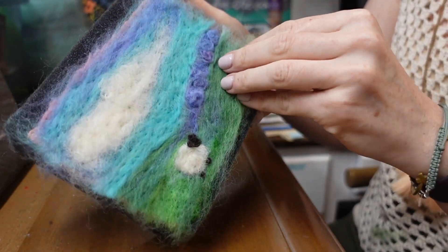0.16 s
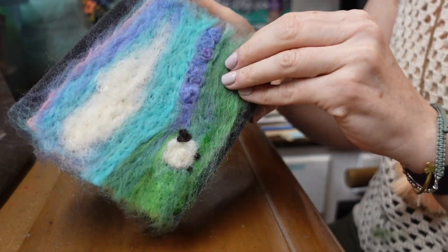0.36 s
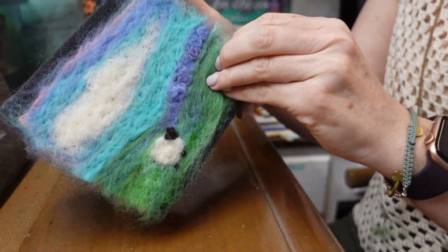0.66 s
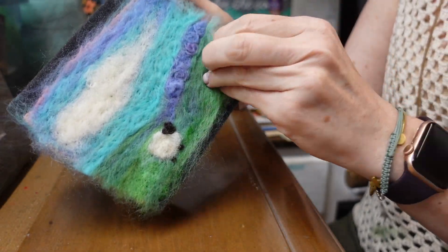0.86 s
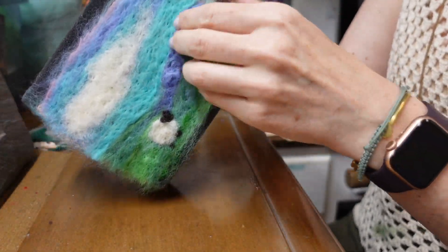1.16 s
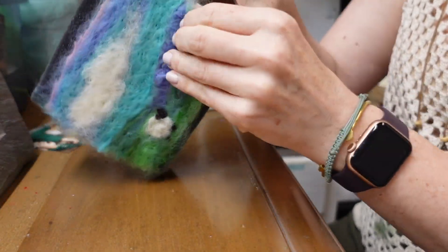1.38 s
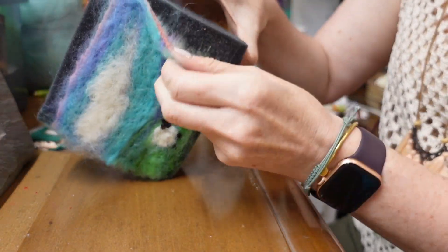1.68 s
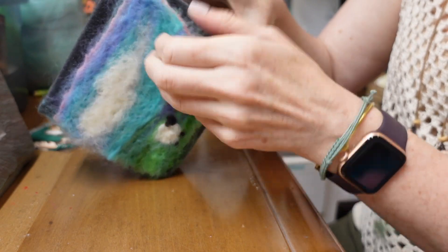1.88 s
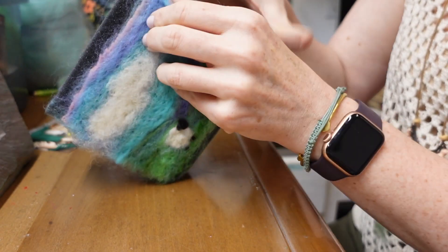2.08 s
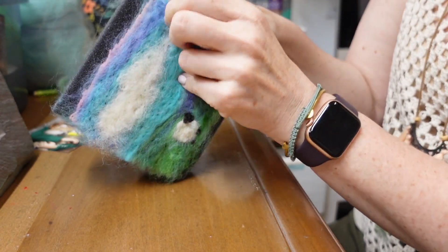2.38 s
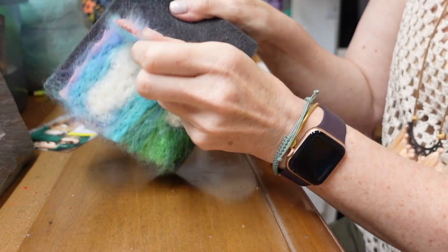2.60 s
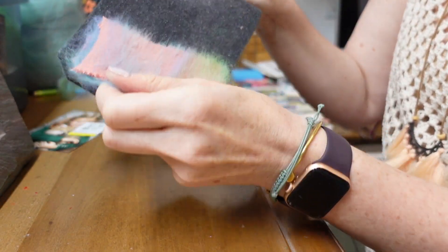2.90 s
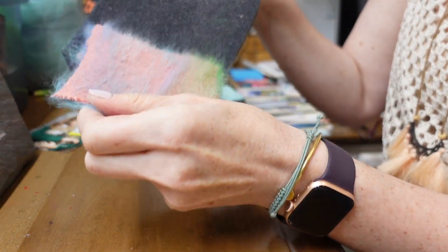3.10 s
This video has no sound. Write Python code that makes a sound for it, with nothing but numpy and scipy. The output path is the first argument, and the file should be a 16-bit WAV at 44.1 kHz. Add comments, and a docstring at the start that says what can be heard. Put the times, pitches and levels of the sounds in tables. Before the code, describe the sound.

Dry ripping of wool fibres from foam, in short pulls, then one long loud tear.

```python
"""Felted wool is peeled off a foam pad by hand, close to a mono microphone. Brushing noise is joined by a dense dry
crackle of random releases while the wool is pulled; filtered noise bursts make the single louder snaps.
Fingers rub as narrow noise swells, a small hard tick is a sum of decaying sines, and the pad bumps the wooden
table as low ringing sines. Under it lie the shaped noise of a quiet room and a wavering low hum."""
import sys
import numpy as np
from scipy import signal
from scipy.fft import rfft, irfft, next_fast_len
from scipy.io import wavfile
from scipy.ndimage import uniform_filter1d, map_coordinates

SR = 44100
rng = np.random.default_rng(int(sys.argv[2]) if len(sys.argv) > 2 else 0)


def elevation(decibels):
    """Turn decibel levels (scalar or array-like) into linear amplitude ratios."""
    levels = np.asarray(decibels, float)
    return 10 ** (levels / 20)


def generate_wav(signal):
    """Clip the signal to [-1, 1] and save it as 16-bit WAV at the path in sys.argv[1]."""
    frames = np.transpose(np.atleast_2d(signal))
    scaled = np.clip(frames, -1, 1) * 32767
    pcm = np.round(scaled).astype(np.int16)
    wavfile.write(sys.argv[1], SR, pcm)


N = 143325

# Course of the rustle: (time [s], level of the 3.3-9.2 kHz band [dB], then level over that band
# below 0.78 kHz [dB], at 0.78-1.5 kHz [dB], at 1.5-3.3 kHz [dB], above 9.2 kHz [dB])
RUSTLE_COURSE = [(0, -37, -12, -16, -7, -5), (0.045, -48.5, -2, -3.5, -3, -6),
                 (0.08, -51.5, -8, -7.5, -5.5, -5), (0.25, -60.5, -0.5, -4.5, -3.5, -3),
                 (0.4, -62.5, -3, -5, -5.5, -2), (0.43, -55, -3.5, -7, -3, -6),
                 (0.7, -47.5, -10, -17.5, -7, -9), (0.79, -40, -14, -14, -8.5, -11),
                 (0.821, -45.5, -7, -5.5, 4, -0.5), (0.85, -39.5, -13.5, -15, -5.5, -10),
                 (0.99, -41.5, -18.5, -20, -8.5, -11), (1.025, -53, -10, -7, -8.5, -4),
                 (1.2, -57.5, -1, -10, -6, -5.5), (1.234, -59.5, -3.5, 0, -1, -5),
                 (1.273, -43.5, -7.5, 0, -1, -13), (1.289, -57, -1, -6, -5, -8),
                 (1.33, -50, -2.5, -2.5, -7.5, -1.5), (1.42, -54.5, -4.5, -5, -5, -6),
                 (1.477, -50.5, -12.5, -12, -11, -5), (1.493, -42.5, -14.5, -5.5, -0.5, 0),
                 (1.541, -38, -11, -12.5, -8.5, -8), (1.698, -31, -15.5, -15.5, -9, -11),
                 (1.751, -23, -14, -18.5, -7.5, -12.5), (1.812, -52.5, -11.5, -6.5, -5, -9),
                 (2.016, -60.5, -3.5, 0.5, -2, 2.5), (2.026, -51, -6.5, -1, 2.5, -8),
                 (2.083, -42.5, -12.5, -4, -7.5, -2), (2.115, -58, -1.5, -8, -4, -8),
                 (2.16, -46.5, -13, -11.5, -10, -16), (2.209, -43.5, -8.5, -7.5, -17, -0.5),
                 (2.25, -52, -7, -8, 0, -10), (2.28, -44, -9, -1.5, -4.5, -8),
                 (2.341, -42, -11.5, -12.5, -10, -10), (2.42, -31, -13.5, -15.5, -6, -13.5),
                 (2.65, -30, -12.5, -19.5, -4.5, -16.5), (2.904, -29.5, -11.5, -13.5, -4, -12),
                 (3.032, -33, -16.5, -25, -6.5, -16), (3.084, -33, -11.5, -22, -4, -13),
                 (3.16, -22.5, -11.5, -23, -3.5, -12.5), (3.25, -21, -11.5, -22, -7.5, -16)]
# Louder single snaps: (time [s], peak of the bright part [dB], pitch [Hz])
SNAP_EVENTS = [(0.1705, -37, 4740), (0.6434, -21, 7110), (0.7173, -24, 5810), (0.7672, -22, 3590),
               (0.7734, -18, 6330), (0.8051, -21, 5860), (0.817, -13, 7100), (0.8324, -20, 3140),
               (0.8794, -23, 4390), (0.9298, -18, 3750), (0.9374, -22, 2910), (0.9807, -21, 6420),
               (1.1333, -27, 7790), (1.4824, -21, 6220), (1.4885, -16, 6180), (1.5194, -22, 6170),
               (1.5903, -14, 4970), (1.6551, -14, 5710), (1.695, -13, 7220), (1.9345, -26, 8120),
               (2.3481, -20, 2000), (2.3624, -17, 5000), (2.3754, -21, 4830), (2.4239, -14, 2680),
               (2.4987, -10, 3370), (2.585, -10, 2850), (2.6604, -12, 5030), (2.6888, -11, 2710),
               (2.6964, -9, 3810), (2.7955, -12, 1890), (2.8794, -11, 3190), (2.8988, -10, 2520),
               (2.9342, -8, 3840), (2.9811, -14, 2460), (3.0455, -13, 6850), (3.0679, -15, 6830),
               (3.0864, -8, 3170), (3.1043, -8, 2650), (3.1243, -11, 2610), (3.1413, -8, 2450)]
# Soft bumps of the pad on the table: (time [s], level of the main partial [dB], pitch [Hz])
BUMP_EVENTS = [(0.453, -41.5, 138), (0.536, -43, 127), (0.937, -44, 140), (1.089, -41.5, 140),
               (1.282, -41.5, 135), (1.345, -33, 167), (1.381, -32, 147), (1.417, -30, 149),
               (1.449, -33.5, 166), (1.467, -28, 141), (1.502, -39, 138), (1.534, -31.5, 133),
               (1.595, -33, 138), (1.834, -43.5, 124), (2.064, -41, 129), (2.09, -42.5, 140),
               (2.172, -40.5, 140), (2.311, -42.5, 85.5)]
# Colour of wool fibres on foam: (frequency [Hz], relative density [dB per Hz])
FIBRE_COLOUR = [(60, -21.5), (120, -8.5), (200, -9), (600, -7.5), (1100, -6.5), (1900, 0.5), (2200, 1.5),
                (2650, 3), (3300, 1), (4000, 0), (6200, -0.5), (7250, 1.5), (8500, -5.5), (11000, -8),
                (16000, -11)]
# Colour of the room tone: (frequency [Hz], relative density [dB per Hz])
ROOM_COLOUR = [(25, 24), (64, 18), (87, 19), (301, -21.5), (2220, -25), (16000, -40)]
# Ringing modes of the hard contact: (frequency [Hz], level over the tick's own [dB], T60 [s])
HARD_MODES = [(312, 3, 0.022), (1490, 6.5, 0.017), (3380, 1, 0.0088)]
# A fingernail or bead touches something hard: (time [s], level [dB])
TICK_EVENTS = [(1.193, -38.5)]
# Pulls of the wool, the only spans that crackle: (start [s], end [s])
PULLS = [(0.57, 1.01), (1.48, 1.8), (2.32, 3.3)]
# Fingers sliding over the wool: (centre time [s], length [s], centre frequency [Hz], level at the crest [dB])
RUB_EVENTS = [(1.268, 0.019, 1640, -41), (1.389, 0.015, 1200, -47), (1.398, .015, 680, -51),
              (2.202, 0.025, 7100, -38.5)]

ROOM_TONE_DB = -64.5
HUM_HZ, HUM_DB, HUM_WAVER_DB = 57, -58, 1.5
ROOM_DB, ROOM_T60_S = -14, 0.17
BUMP_RISE_S, BUMP_T60_S = 0.01, 0.073
BUMP_SAG = 0.033  # share by which the pitch falls in each half T60
RUB_WIDTH_OCTAVES = 0.17
SNAP_RISE_S, SNAP_T60_S = 0.0002, 0.0065
SNAP_RING_DB, SNAP_WIDTH_OCTAVES = 10, 0.25  # lift at a snap's own pitch
SNAP_BODY_DB, SNAP_TOP_DB = -7.5, -1  # added to the rustle's own band levels
BAND_EDGES_HZ, EDGE_STEEPNESS = (780, 1500, 3300, 9200), 10.6
PATCHY_DB = 2
CRACKLE_PER_S = 1100  # releases a second where the rustle level is -35 dB
CRACKLE_DENSER = 0.69  # dB more releases a second for each dB of rustle level
CRACKLE_SPREAD_DB, CRACKLE_MOST_DB = 5.5, 13  # mean of the exponential draw of sizes, and its cap
CRACKLE_RISE_S, CRACKLE_T60_S = 0.0001, 0.004
# inside a pull, crackle takes half the power once the rustle passes this level; below it only brushing is heard
SHARE_AT_DB, SHARE_PER_DB, SHARE_MOST = -46, 9, 0.5
CEILING = 0.5


def unit(x):
    """Scale to rms 1."""
    return x / np.sqrt(np.mean(x ** 2) + 1e-20)


def along(points, hz):
    """Read (frequency, value) points on a log-frequency axis."""
    f, v = np.transpose(points)
    return np.interp(np.log(hz + 1), np.log(f + 1), v)


def wobble(rate):
    """A smooth random curve with rate knots a second."""
    return map_coordinates(rng.standard_normal(int(N * rate / SR) + 4), [np.arange(N) * rate / SR])


def filtered(x, response):
    """Filter x by a response given as a function of frequency."""
    m = next_fast_len(x.shape[-1] + 8192)
    spectrum = rfft(x, m) * response(np.fft.rfftfreq(m, 1 / SR))
    return irfft(spectrum, m)[..., :x.shape[-1]]


def burst(rise_s, t60_s, t):
    """Quick rise, exponential fall, peak 1."""
    shape = (1 - np.exp(-t / rise_s)) * elevation(-60 * t / t60_s)
    return shape / shape.max()


def bell(hz, centre_hz, octaves):
    """A bump on a log-frequency axis, peak 1."""
    return np.exp(-0.5 * (np.log2((hz + 1) / centre_hz) / octaves) ** 2)


def fibre_bands(hz):
    """The colour of wool on foam, split into five neighbouring bands."""
    lowpasses = [1 / (1 + (hz / edge_hz) ** EDGE_STEEPNESS) for edge_hz in BAND_EDGES_HZ]
    under = [0 * hz] + lowpasses + [0 * hz + 1]
    return elevation(along(FIBRE_COLOUR, hz)) * np.diff(under, axis=0)


def patchy(x):
    """Random gain in patches some 500 Hz wide and 50 ms long, for a tear line that moves."""
    z = signal.stft(x, nperseg=256)[2]
    field = rng.standard_normal(z.shape)
    field = uniform_filter1d(field, size=3, axis=0)
    field = uniform_filter1d(field, size=18, axis=1)
    return signal.istft(z * elevation(PATCHY_DB * unit(field)), nperseg=256)[1][:N]


def background():
    """Room tone as shaped steady noise, and a low hum that wavers in phase and level."""
    air = unit(filtered(rng.standard_normal(N), lambda hz: elevation(along(ROOM_COLOUR, hz))))
    hum = np.sin(2 * np.pi * HUM_HZ * np.arange(N) / SR + 0.58 * wobble(8.0))
    hum_level = elevation(HUM_DB + HUM_WAVER_DB * wobble(13.5))
    return elevation(ROOM_TONE_DB) * air + hum_level * hum


def room(x):
    """The short diffuse answer of a furnished room: a decaying noise tail."""
    t = np.arange(SR // 3) / SR
    tail = rng.standard_normal(len(t)) * elevation(-60 * t / ROOM_T60_S) * (t > 0.002)
    return signal.fftconvolve(x, tail / np.linalg.norm(tail))[:N]


def bumps():
    """The soft pad sets the table top ringing low and briefly; the pitch falls as the pad settles."""
    out, t = np.zeros(N + SR), np.arange(SR // 4) / SR
    for s, db, hz in BUMP_EVENTS:
        turns = hz * t * (1 + BUMP_SAG * (0.5 - t / BUMP_T60_S))
        ring = np.sin(2 * np.pi * turns)
        ring += 0.5 * np.sin(2 * np.pi * 0.655 * turns)
        ring += 0.081 * np.sin(2 * np.pi * 1.66 * turns)
        out[round(s * SR):][:len(t)] += elevation(db) * burst(BUMP_RISE_S, BUMP_T60_S, t) * ring
    return out[:N]


def tick():
    """A small hard contact: a few modes start together and decay."""
    out = np.zeros(N)
    for s, tick_db in TICK_EVENTS:
        t = np.clip(np.arange(N) / SR - s, 0, None)  # the sines stay at zero before the contact
        for hz, db, t60 in HARD_MODES:
            out += elevation(tick_db + db - 60 * t / t60) * np.sin(2 * np.pi * hz * t)
    return out


def rubs():
    """Fingers slide over the wool: short swells of narrow friction noise."""
    out, t = np.zeros(N), np.arange(N) / SR
    for s, length, centre_hz, db in RUB_EVENTS:
        swell = np.exp(-0.5 * ((t - s) / (length / 2)) ** 2)
        friction = filtered(rng.standard_normal(N), lambda hz: bell(hz, centre_hz, RUB_WIDTH_OCTAVES))
        out += elevation(db) * swell * unit(friction)
    return out


def snaps():
    """Each snap is a fresh noise burst of a few ms in the colour of the fibres, lifted at its own pitch."""
    lead = 512  # samples of silence ahead of a burst, room for the filter to ring backwards
    out, t = np.zeros(N + SR), np.arange(2048) / SR
    when, _, *courses = np.transpose(RUSTLE_COURSE)
    for s, db, pitch_hz in SNAP_EVENTS:
        deep_db, hollow_db, low_db, top_db = [np.interp(s, when, c) for c in courses]
        crack = np.pad(rng.standard_normal(len(t)) * burst(SNAP_RISE_S, SNAP_T60_S, t), (lead, 0))
        deep, hollow, low, high, top = filtered(
            crack, lambda hz: fibre_bands(hz) * elevation(SNAP_RING_DB * bell(hz, pitch_hz, SNAP_WIDTH_OCTAVES)))
        low = low * elevation(np.minimum(SNAP_BODY_DB + low_db, 0) / 2)
        middle = low + high
        top = top / np.abs(top).max() * np.abs(middle).max()
        bright = middle + elevation(SNAP_TOP_DB + top_db) * top
        snap = bright / np.abs(bright).max()
        snap += elevation(SNAP_BODY_DB + deep_db) * deep / np.abs(deep).max()
        snap += elevation(SNAP_BODY_DB + hollow_db) * hollow / np.abs(hollow).max()
        out[round(s * SR):][:len(crack)] += elevation(db) * snap
    return out[lead:N + lead]


def crackle_gate(level_db):
    """Tiny fibre releases of very unequal size, each a quick burst, evened out to a steady local rms."""
    chance, size = rng.random((2, N))
    size_db = np.minimum(-CRACKLE_SPREAD_DB * np.log(size + 1e-9), CRACKLE_MOST_DB)
    releases_per_s = CRACKLE_PER_S * elevation(CRACKLE_DENSER * (level_db + 35))
    kicks = (chance < releases_per_s / SR) * elevation(size_db)
    release = burst(CRACKLE_RISE_S, CRACKLE_T60_S, np.arange(SR // 20) / SR)
    gate = signal.fftconvolve(kicks, release)[:N]
    return gate / np.sqrt(np.abs(uniform_filter1d(gate ** 2, size=SR // 16)) + 1e-9)


def rustle():
    """Smooth brushing noise, sharing its power with the crackle inside pulls, in five bands with set courses."""
    t = np.arange(N) / SR
    s, *courses = np.transpose(RUSTLE_COURSE)
    level_db, deep_db, hollow_db, low_db, top_db = [np.interp(t, s, c) for c in courses]
    gate = crackle_gate(level_db)
    share = np.clip(SHARE_PER_DB * (level_db - SHARE_AT_DB), 0, SHARE_MOST)
    share *= sum((t > start) & (t < end) for start, end in PULLS)
    brush_power = elevation(0.27 * wobble(49))
    drive = rng.standard_normal(N) * np.sqrt(share * gate ** 2 + (1 - share) * brush_power)
    deep, hollow, low, high, top = [unit(band) for band in filtered(patchy(drive), fibre_bands)]
    fizz = unit(filtered(rng.standard_normal(N), fibre_bands)[-1])  # half of the top is plain hiss
    mix = high + elevation(deep_db) * deep + elevation(hollow_db) * hollow
    mix += elevation(low_db + 0.26 * wobble(50)) * low
    mix += elevation(top_db) * (top + fizz) / np.sqrt(2)
    return elevation(level_db) * mix


def scene():
    """Everything reaches one microphone, heard alike on both channels; only the hands excite the room tail."""
    hands = rustle() + snaps() + rubs() + tick()
    mono = hands + elevation(ROOM_DB) * room(hands) + bumps() + background()
    return np.tile(mono, (2, 1))


def top_cut(x):
    """Nothing passes above the cut-off."""
    return signal.sosfilt(signal.butter(12, 15750, fs=SR, output="sos"), x)


def record(dry):
    """Peaks are rounded off softly towards the ceiling."""
    mix = dry / (1 + np.abs(dry / CEILING) ** 4) ** (1 / 4)
    return top_cut(mix)


dry = scene()
out = record(dry)
generate_wav(out)
```